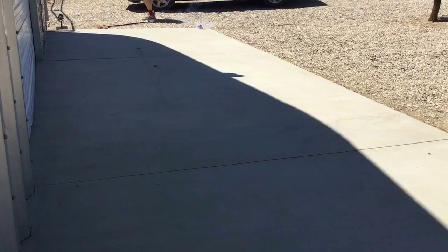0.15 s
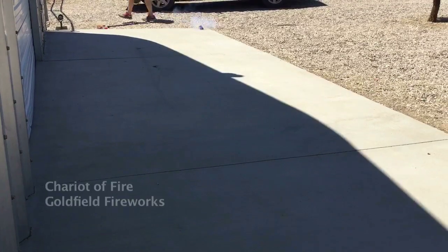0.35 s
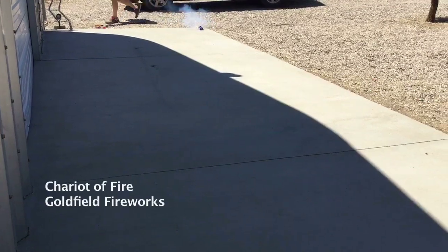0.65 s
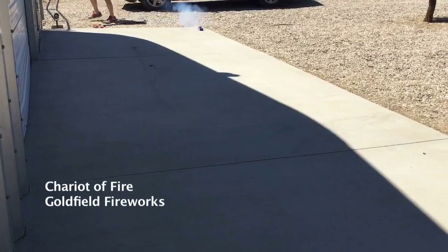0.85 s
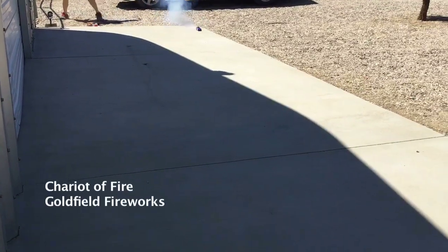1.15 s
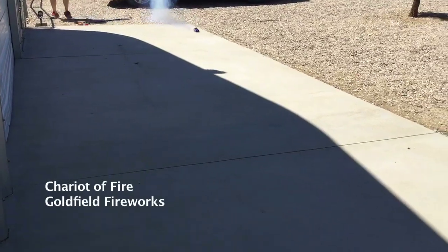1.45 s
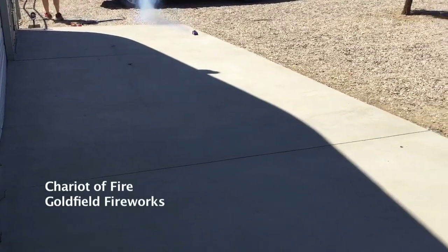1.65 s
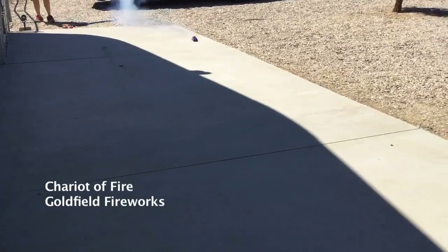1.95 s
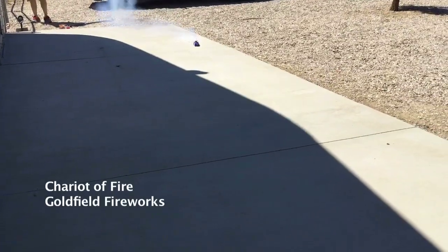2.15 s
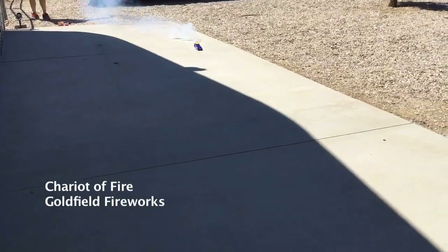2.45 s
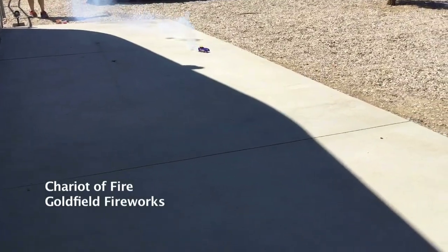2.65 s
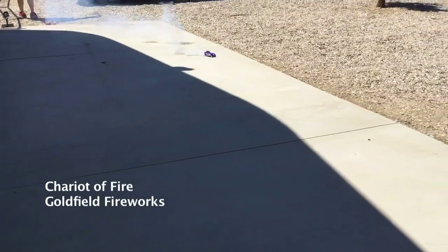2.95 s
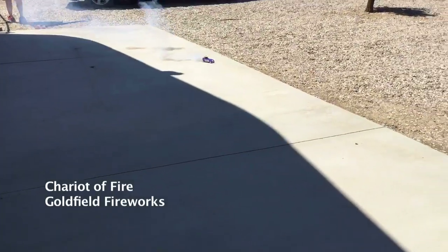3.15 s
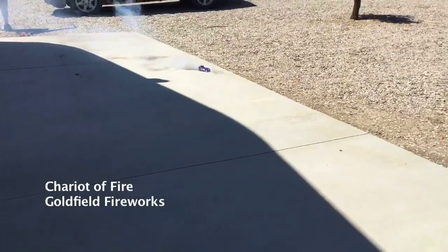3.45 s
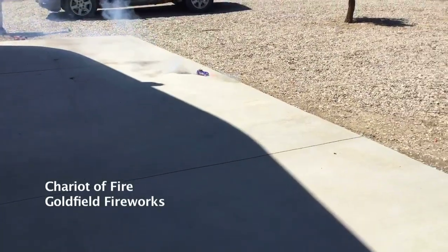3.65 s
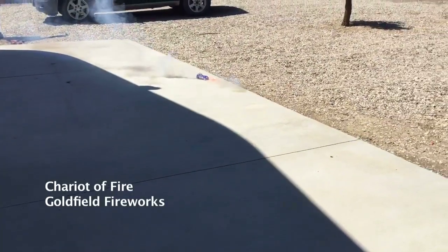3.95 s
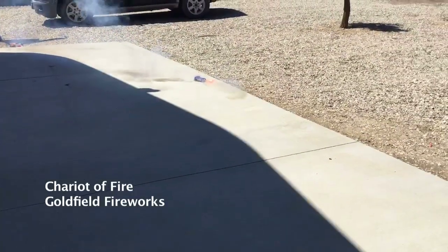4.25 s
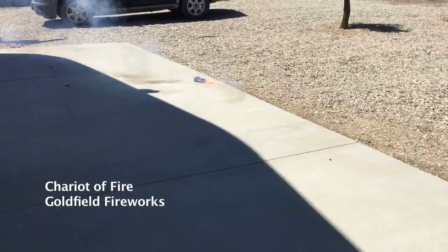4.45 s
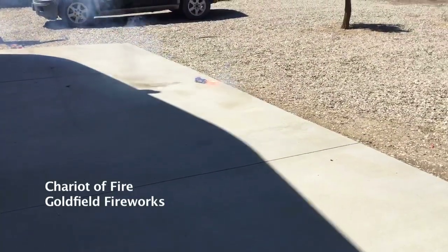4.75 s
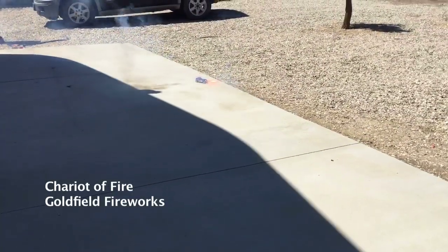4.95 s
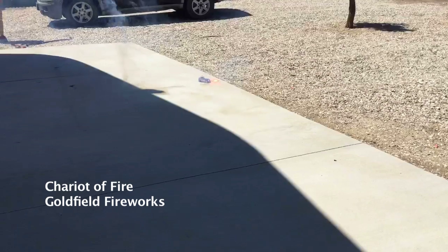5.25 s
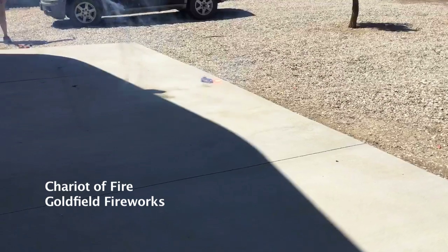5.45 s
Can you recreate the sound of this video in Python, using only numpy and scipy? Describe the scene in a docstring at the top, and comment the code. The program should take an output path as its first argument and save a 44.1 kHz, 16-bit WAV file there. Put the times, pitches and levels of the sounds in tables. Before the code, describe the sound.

Outdoors, a piercing firework whistle sinks from very high to lower, sputters out, and leaves spits, faint jet hiss and fluttering flame.

```python
"""Whistling firework car on a driveway

A whistle tube lights with a rasp, shrieks as a harmonic tone that sinks in pitch, then sputters out.
Shaped noise makes its gas rush, a plain jet's hiss and surges, and a soft flame with spits and crackle.
Moving ground bounces, a late treble echo and a yard reverb surround it, as the car rolls nearer and stops.
Rumbling noise and low swells make the breeze on the microphone and the thump as the whistle goes out;
gliding sines make a far bird."""
import sys
import numpy as np
from scipy import signal
from scipy.fft import rfft, irfft
from scipy.io import wavfile
from scipy.ndimage import map_coordinates

SR = 44100
rng = np.random.default_rng(int(sys.argv[2]) if len(sys.argv) > 2 else 0)


def generate_wav(signal):
    """Clip the signal to [-1, 1] and save it as 16-bit WAV at the path in sys.argv[1]."""
    frames = np.transpose(np.atleast_2d(signal))
    scaled = np.clip(frames, -1, 1) * 32767
    pcm = np.round(scaled).astype(np.int16)
    wavfile.write(sys.argv[1], SR, pcm)


N = 246492


def undb(db):
    """Decibels to gain."""
    return 10 ** (np.asarray(db) / 20)


def times():
    """The time of each sample in seconds."""
    return np.arange(N) / SR


def since(start_s):
    """Seconds since a moment, 0 before it."""
    return np.maximum(times() - start_s, 0)


def curves(table):
    """Automation lanes: the columns of a table, joined by straight lines in time."""
    s, *columns = np.transpose(table)
    return [np.interp(times(), s, column) for column in columns]


def unit(x):
    """Scale to a standard deviation of 1."""
    return x / np.std(x)


def fade_in(start_s, length_s):
    """A ramp from 0 to 1."""
    return np.clip((times() - start_s) / length_s, 0, 1)


def span(start_s, attack_s, end_s, release_s):
    """Straight attack, hold at 1, straight release."""
    return fade_in(start_s, attack_s) * (1 - fade_in(end_s, release_s))


def bursts(table, attack_s, release_s, sag_db_per_s=0):
    """Gain of overlapping noise bursts: each rises, sags from its start and dies away; powers add."""
    gains = []
    for s, length, db in table:
        attack = fade_in(s, attack_s)
        release = np.exp(-np.minimum(since(s + length) / release_s, 20))
        gains.append(undb(db + sag_db_per_s * since(s)) * attack * release)
    return np.linalg.norm(gains, axis=0)


def walk(rate_hz):
    """Smooth random modulation of spread 1: low-passed white noise."""
    lowpass = signal.butter(2, min(rate_hz, SR / 4), fs=SR, output="sos")
    return unit(signal.sosfilt(lowpass, rng.standard_normal(N)))


def noise(colour, grain=0):
    """Unit-level noise with a drawn spectrum; grain breaks it into tiny crackles."""
    hz, db = np.transpose(colour)
    f = np.fft.rfftfreq(N, 1 / SR) + 1  # the offset avoids log(0)
    low_cut = 1 / (1 + (hz[0] / 2 / f) ** 4)
    spectrum = undb(np.interp(np.log(f), np.log(hz), db))
    source = rng.standard_normal(N) * np.exp(grain * walk(900))
    return unit(irfft(rfft(source) * low_cut * spectrum, N))


# rumble spectrum: [f/Hz, relative level/dB]
BREEZE_COLOUR = [(21, -36), (35, -4), (91, 0.5), (124, -0.5), (157, 2), (326, -4), (400, -20), (520, -48),
                 (880, -120)]
# quiet outdoor air spectrum: [f/Hz, relative level/dB]
AIR_COLOUR = [(300, 0.5), (600, -8), (1500, -12.5), (4000, -15.5), (8000, -29), (15000, -23)]
# single low swells: wind eddies, and the low thump as the whistle goes out at 2.087 s:
# [t/s, peak level/dB, f/Hz, width (Gaussian sigma)/s]
LOW_SWELLS = [(0.612, -41.5, 90, 0.037), (1.637, -42.5, 75, 0.014), (2.087, -36, 210, 0.022),
              (2.782, -38, 80.3, 0.022), (3.257, -30.5, 71.5, .011), (3.741, -25.5, 81.5, 0.014),
              (3.923, -30.5, 58.3, 0.015), (5.117, -31, 73, 0.024), (5.354, -32.5, 66.1, 0.0099),
              (5.58, -31, 100, 0.016)]
CALM_DB, FRESHEN_S, FRESHEN_DB_PER_S = -50.5, 2.08, 2.5  # calm rumble, then its rise


def breeze(air_db=-55):
    """Uneven low rumble that freshens, with low swells as wavering sines, over outdoor air."""
    rumble_db = CALM_DB + FRESHEN_DB_PER_S * since(FRESHEN_S)
    out = noise(BREEZE_COLOUR) * undb(rumble_db + 2 * walk(6.8))
    for s, peak_db, hz, width in LOW_SWELLS:
        swell = np.exp(-np.minimum(((times() - s) / width) ** 2 / 2, 20))
        wavering_hz = hz * (1 + 0.38 * walk(80))
        out += undb(peak_db) * swell * np.sin(2 * np.pi * np.cumsum(wavering_hz) / SR)
    return out + noise(AIR_COLOUR) * undb(air_db + 1.6 * walk(7))


# bird notes: [t/s, length/s, first f/Hz, last f/Hz, peak level/dB]
NOTES = [(4.793, .035, 2950, 3460, -58), (4.825, .035, 3400, 2910, -55), (5.44, 0.03, 4450, 4950, -52.5),
         (5.461, 0.031, 4200, 3400, -50), (5.496, .02, 3500, 3800, -51.5), (5.51, 0.021, 2990, 3320, -52)]


def bird(waver=0.0067):
    """Thin far-off sine notes; each swells, slurs up or down and fades; waver is a share of pitch."""
    out = np.zeros(N)
    for s, length, first_hz, last_hz, db in NOTES:
        progress = fade_in(s, length)
        hz = (first_hz + (last_hz - first_hz) * progress) * (1 + waver * walk(254))
        out += undb(db) * np.sin(np.pi * progress) * np.sin(2 * np.pi * np.cumsum(hz) / SR)
    return out


# spells of fine crackle: [t/s, length/s, level/dB]
CRACKLES = [(2.27, 0.18, -56), (3.8, 0.78, -58)]


def crackle(per_second=140, spread=0.75, attack_s=0.033, release_s=0.89):
    """Tiny grains of fuel burst at random as decaying noise, a few much louder than the rest."""
    pops = (rng.random(N) < per_second / SR) * np.exp(spread * rng.standard_normal(N))
    grains = signal.lfilter([1], [1, -np.exp(-1 / (0.0035 * SR))], pops)  # 3.5 ms decay
    texture = unit(grains * noise([(800, -6.5), (3000, -19.0), (15000, -33.0)]))
    return texture * bursts(CRACKLES, attack_s, release_s)


# spits of burning fuel: [t/s, onset level before trim/dB, brightness f/Hz, decay/s]
SPITS = [(2.192, -43, 6000, 0.0009), (2.297, -33, 8960, 0.00082), (2.359, -24.5, 12100, 0.00068),
         (2.417, -29.5, 3960, 0.0026), (2.519, -50, 2200, 0.0032), (2.569, -35, 2200, 0.0049),
         (2.64, -33.5, 2480, .004), (2.677, -35, 1990, .004), (3.336, -41, 10000, 0.036),
         (4.358, -25, 1210, 0.0019)]


def spits(trim_db=-5):
    """Bits of slag pop out of the nozzle: sudden noise with a quick exponential decay."""
    out = np.zeros(N)
    for s, db, hz, decay in SPITS:
        age = since(s)
        crack = noise([(hz / 8, -10), (hz, 0), (10 * hz, -45)])
        out += undb(db + trim_db) * crack * (age > 0) * np.exp(-np.minimum(age / decay, 20))
    return out


# flame spectrum: [f/Hz, relative level/dB]
FLAME_COLOUR = [(200, 3), (500, 2), (800, 1.5), (1150, -2), (1900, -1.5), (2600, -10.5), (3800, -9.5),
                (7000, -50), (12000, -48)]
# flares of the open flame: [t/s, length/s, starting level/dB]
FLARES = [(3.68, 0.064, -42.5), (3.83, 0.737, -41.5)]
FLAME_S, FLAME_DB = 2.8, -60.5  # the flame opens, and its steady bed under the flares


def flame(attack_s=0.02, release_s=0.085, sag_db_per_s=-9, flicker_db=1.5):
    """The jet opens into a fluttering flame: grainy noise that flares up and settles."""
    bed = undb(FLAME_DB) * fade_in(FLAME_S, attack_s)
    roar = np.hypot(bed, bursts(FLARES, attack_s, release_s, sag_db_per_s))
    return noise(FLAME_COLOUR, grain=0.28) * roar * undb(flicker_db * walk(81))


# jet spectrum: [f/Hz, relative level/dB]
JET_COLOUR = [(400, -14.5), (1300, 2.5), (2200, -1), (4300, 6), (5300, 1), (6400, 6), (8200, -1),
              (11400, 3), (13000, -6), (15500, -22)]
# surges of the jet: [t/s, length/s, level/dB]
JET_SURGES = [(2.48, 1.01, -49.5), (2.75, .5, -67), (3.06, .12, -42.5), (3.33, 0.037, -45),
              (3.51, 0.083, -43)]
JET_IDLE_DB, JET_DWINDLE_S, JET_DB_PER_S = -56.5, 4.86, -13  # idle hiss, then its fade


def jet(attack_s=0.018, release_s=0.081, flicker_db=1.17):
    """The drive charge hisses through its nozzle and surges as it pushes the car."""
    idle = undb(JET_IDLE_DB + JET_DB_PER_S * since(JET_DWINDLE_S))
    flow = np.hypot(idle, bursts(JET_SURGES, attack_s, release_s))
    return noise(JET_COLOUR, grain=0.19) * flow * undb(flicker_db * walk(50))


# coughs of the tube as it lights and as it dies: [t/s, length/s, level/dB]
COUGHS = [(0.1, 0.038, -25), (2.054, 0.014, -36)]
COUGH_ATTACK_S, COUGH_RELEASE_S = 0.014, 0.0334


def coughing():
    """Gain of the coughs, for the rough gas noise and the unsteady tone."""
    return sum(undb(db) * span(s, COUGH_ATTACK_S, s + length, COUGH_RELEASE_S)
               for s, length, db in COUGHS)


# whistle gas spectrum: [f/Hz, relative level/dB]
RUSH_COLOUR = [(200, -8.5), (550, -11), (850, -2), (1100, -6), (1500, -3.5), (3400, 3), (4600, -12),
               (6500, 1), (9000, -6), (12000, -6), (15500, -29)]
# cough spectrum: [f/Hz, relative level/dB]
COUGH_COLOUR = [(300, -20), (1000, -1), (1700, 5.5), (4000, -4.5), (6500, 1), (8500, -12.5), (13000, -23),
                (15000, -27)]
LIGHT_S, OUT_S = 0.1039, 2.081  # the whistle lights and goes out
DYING_S, DYING_DB = 0.071, -10.5  # last gasp of the whistle: length and loss of level
RUSH_DB, RUSH_RELEASE_S = -38, 0.022


def rush(treble_db_per_s=4, bass_db_per_s=-2.0, split_hz=3000):
    """Turbulent gas hiss from the tube, treble slowly rising, bass sinking, a rough cough at each end."""
    length_s = OUT_S - DYING_S / 2 - LIGHT_S
    flow = bursts([(LIGHT_S, length_s, RUSH_DB)], 0.019, RUSH_RELEASE_S)
    gas = noise(RUSH_COLOUR)
    bass = signal.sosfiltfilt(signal.butter(2, split_hz, fs=SR, output="sos"), gas)
    treble = gas - bass
    age = np.minimum(times(), OUT_S) - (LIGHT_S + OUT_S) / 2  # from the middle of the burn
    gas = bass * undb(bass_db_per_s * age) + treble * undb(treble_db_per_s * age)
    return gas * flow * undb(.8 * walk(60)) + noise(COUGH_COLOUR, grain=0.17) * coughing()


# how well the tube radiates its overtones: [f/Hz, level/dB]
OVERTONE_COLOUR = [(1650, -1.5), (2050, -6.5), (2400, 1), (5600, 3), (6900, 2.5), (7450, -0.5),
                   (9000, -6.5), (9800, -2.5), (10600, 1.5), (12000, -1.5), (13200, -18.5), (15000, -17.5)]


def radiated(hz):
    """Level in dB with which the tube gives off an overtone."""
    points, db = np.transpose(OVERTONE_COLOUR)
    return np.interp(np.log(hz), np.log(points), db)


# warm tube resonance, sinking as the fuel burns down: [t/s, f/Hz]
PITCH = [(0.2, 4913), (0.21, 4946), (0.328, 4869), (0.424, 4646), (0.588, 4633), (0.68, 4422),
         (0.748, 4476), (0.788, 4308), (0.804, 4406), (0.912, 4221), (0.972, 4042), (1.04, 4006),
         (1.06, 4110), (1.09, 4101), (1.126, 3855), (1.152, 3834), (1.234, 3963), (1.296, 3634),
         (1.568, 3436), (1.742, 3391), (1.952, 3279), (2.04, 3326)]
# strength of the whistle before dips and coughs: [t/s, level/dB]
TONE = [(.2, -25.5), (.32, -22), (.41, -16), (.7, -11.5), (.85, -16), (1.13, -11.5), (1.24, -15.5),
        (1.35, -10), (2.03, -10.5)]
# brief dips in the tone: [t/s, depth/dB]
DIPS = [(0.353, -22), (0.449, -14.5), (0.712, -28.5), (0.849, -16.5)]
DIP_S = .007  # from the centre of a dip to half its depth in dB
# harmonics 2, 3 and 4 against the tone, before radiation: [level/dB]
HARMONIC_DB = [-20, -13, -24.5]
# partials at 1/2, 3/2, 5/2 and 7/2 of the pitch, against each other, before radiation: [level/dB]
HALF_DB = [0.5, -2, -6.5, -10.5]
# strong and weak pulses alternate: [start t/s, attack/s, end t/s, release/s]
ALTERNATING = (0.059, 0.47, 1.256, 0.25)
# half-pitch level during the alternation, and its offsets before and after
HALF_LEVEL_DB, HALF_BEFORE_DB, HALF_AFTER_DB = -27.5, -15, -20.5
HALF_SCATTER = 1.54  # phase slip of the half-pitch partials once alternation breaks up, radians
# start flat by a share of pitch, warm-up time constant, share flat again when dying
COLD_FLAT, WARM_UP_S, DYING_FLAT = .39, .029, 0.0623
# jitter as a share of pitch: steady burn, added while alternating, added in the strongest cough
STEADY_JITTER, ALTERNATING_JITTER, COUGH_JITTER = .003, 0.0027, 0.032
COUGH_KICK_DB = 9  # lift by a full-strength cough in a warm tube; less while cold
# the third harmonic fades briefly: start, attack, end, release in s, and depth
THIRD_FADE, THIRD_FADE_DB = (1.687, 0.018, 1.754, .13), -14


def whistle(flutter_db=1.0, rasp=14, overtone_flutter_db=2.0):
    """Fuel burns in pulses at the tube's resonance; alternating strong and weak ones add half-pitch tones."""
    resonance, = curves(PITCH)
    strength, = curves(TONE)
    alternating = span(*ALTERNATING)
    dying = fade_in(OUT_S - DYING_S, DYING_S)
    cough = coughing()
    cough = cough / cough.max()
    cold = np.exp(-since(LIGHT_S) / WARM_UP_S)

    hz = resonance * (1 - COLD_FLAT * cold) * (1 - DYING_FLAT * dying)
    jitter = STEADY_JITTER + ALTERNATING_JITTER * alternating + COUGH_JITTER * cough
    stray = jitter * (walk(70.1) + 0.92 * walk(270))
    phase = 2 * np.pi * np.cumsum(hz * (1 + stray)) / SR

    level = strength + DYING_DB * dying
    dips = sum(db / (1 + ((times() - s) / DIP_S) ** 4) for s, db in DIPS)
    kick = COUGH_KICK_DB * cough * (1 - cold)
    tone = undb(level + kick + dips) * np.sin(phase)

    for k, db in enumerate(HARMONIC_DB, 2):
        fade = THIRD_FADE_DB * span(*THIRD_FADE) * (k == 3)
        flutter = overtone_flutter_db * walk(40)
        tone += undb(level + db + radiated(k * hz) + fade + flutter) * np.sin(k * phase)

    begun, broken = fade_in(*ALTERNATING[:2]), fade_in(*ALTERNATING[2:])
    half_level = HALF_LEVEL_DB + HALF_BEFORE_DB * (1 - begun) + HALF_AFTER_DB * broken
    slip = HALF_SCATTER * broken * walk(160)
    for k, db in enumerate(HALF_DB):
        order = k + .5
        gain = undb(half_level + db + radiated(order * hz) + walk(25))
        tone += gain * np.sin(order * phase + slip)

    burning = span(LIGHT_S, .004, OUT_S, .01)
    splutter = np.exp(rasp * jitter * walk(210))  # an unsteady burn also breaks up the level
    return np.sqrt(2) * tone * burning * splutter * undb(flutter_db * walk(37))


# reflections close to the car once it has stopped: [delay/ms, share of the direct sound]
BOUNCES = [(1.04, .27), (1.24, .3)]
ROLL_S, ROLL_M = (.1, 3.85), (16, 5.25)  # the car rolls nearer and stops: times, distances
WALL_S = .0018  # delay off the wall beside the microphone


def ground(x, wall=0.22):
    """Concrete bounces arrive later as the car nears, so their comb slides down; the wall's one grows."""
    nearness = ROLL_M[-1] / np.interp(times(), ROLL_S, ROLL_M)
    wall = wall * nearness ** 2
    out = x + wall * np.interp(times() - WALL_S, times(), x)
    for ms, share in BOUNCES:
        late = np.arange(N) - SR * nearness * ms / 1000  # where to read, in samples
        out = out + share * map_coordinates(x, [late], order=3)
    return out / np.sqrt(1 + wall ** 2 + sum(share ** 2 for _, share in BOUNCES))


def slap(x, echo_db=-10, delay_s=.03, panel_hz=2900):
    """The parked car's panels return only highs; the late pitch beats against the falling whistle."""
    highs = signal.sosfilt(signal.butter(4, panel_hz, "high", fs=SR, output="sos"), x)
    late = np.interp(times() - delay_s, times(), highs)
    return (x + undb(echo_db) * late) / np.sqrt(1 + undb(echo_db) ** 2)


# house wall and far fronts: [delay/s, level before the low-pass/dB]
ECHOES = [(.0087, -18.5), (0.053, -20.5), (0.164, -31.5), (.26, -32)]


def yard(x, near_db=-15, near_t60=0.073, far_db=-20, far_t60=1.0, dull_hz=7500):
    """Single echoes, quick scatter from the gravel and a thin neighbourhood tail, all dulled."""
    t = np.arange(SR) / SR
    near = rng.standard_normal(SR) * np.exp(-np.log(1000) * t / near_t60)
    far = rng.standard_normal(SR) * np.exp(-np.log(1000) * t / far_t60)
    response = undb(near_db) * near / np.linalg.norm(near)
    response += undb(far_db) * far / np.linalg.norm(far)
    for delay, db in ECHOES:
        response[int(delay * SR)] += undb(db)
    lowpass = signal.butter(1, min(dull_hz, SR / 3), fs=SR, output="sos")
    return x + signal.fftconvolve(x, signal.sosfilt(lowpass, response))[:N]


def scene():
    """The firework and the bird in the yard, with the breeze and low swells on top."""
    burning = rush() + jet() + flame() + spits() + crackle()
    firework = slap(whistle()) + ground(burning)
    return (yard(firework + bird()) + breeze())[None]


def record(dry, top_hz=15150):
    """The microphone chain thins the deepest bass and cuts the top steeply."""
    thinned = signal.sosfilt(signal.butter(3, 38, "high", fs=SR, output="sos"), dry)
    return signal.sosfilt(signal.ellip(10, .1, 80, top_hz, fs=SR, output="sos"), thinned)


dry = scene()
out = record(dry)
generate_wav(out)
```